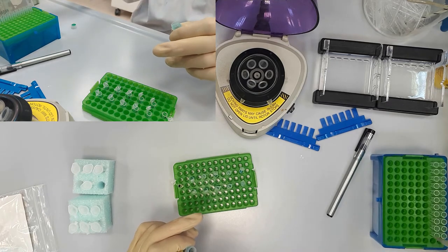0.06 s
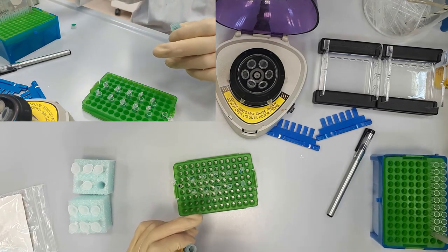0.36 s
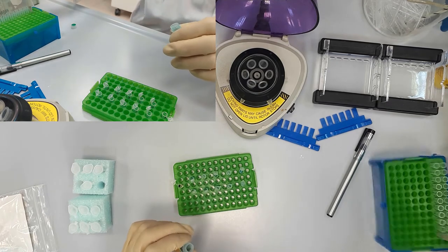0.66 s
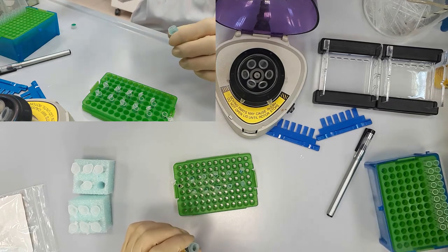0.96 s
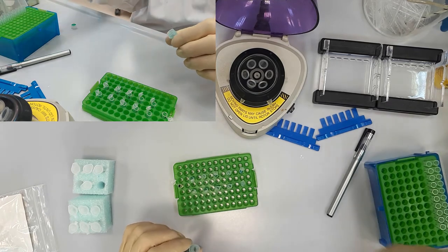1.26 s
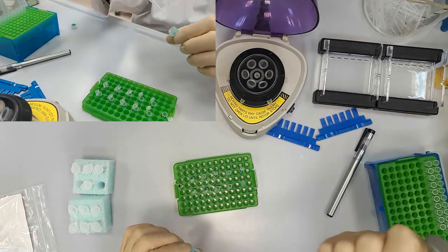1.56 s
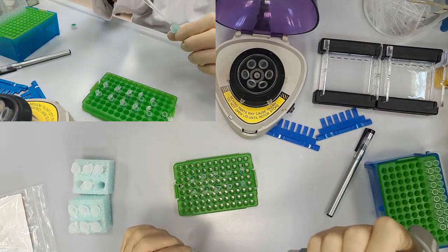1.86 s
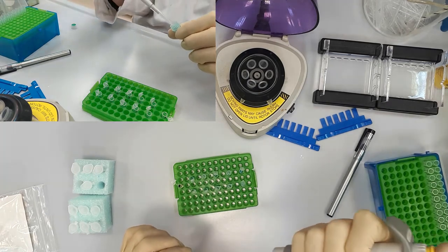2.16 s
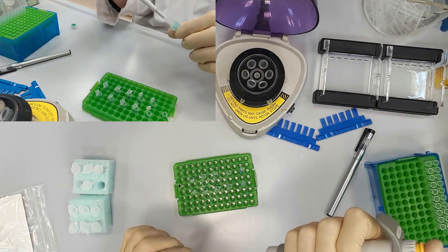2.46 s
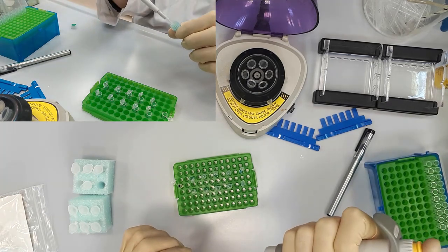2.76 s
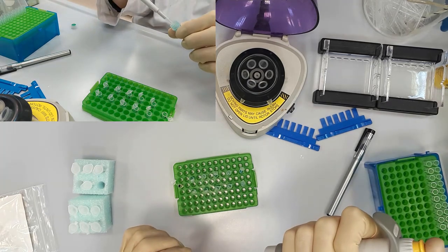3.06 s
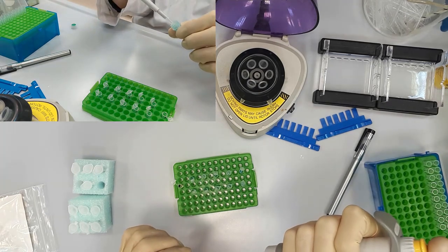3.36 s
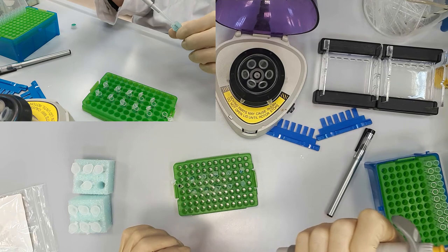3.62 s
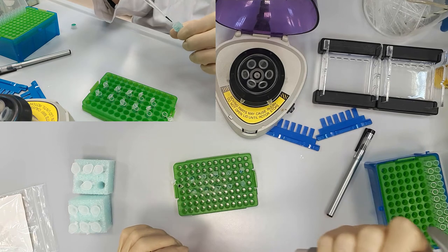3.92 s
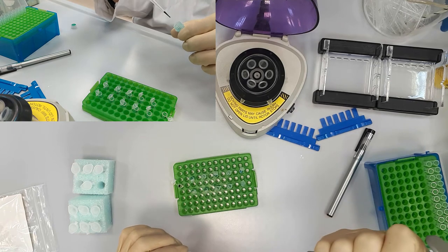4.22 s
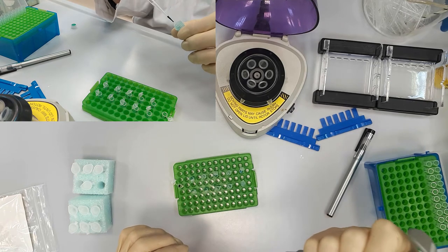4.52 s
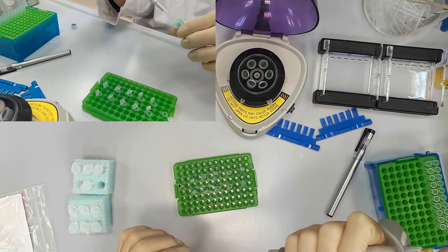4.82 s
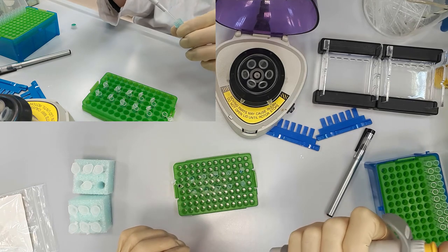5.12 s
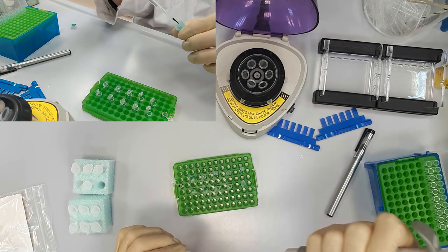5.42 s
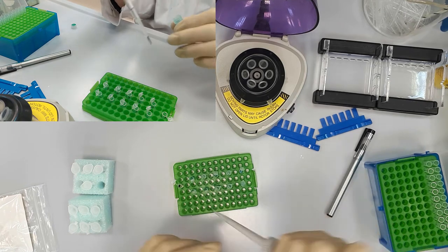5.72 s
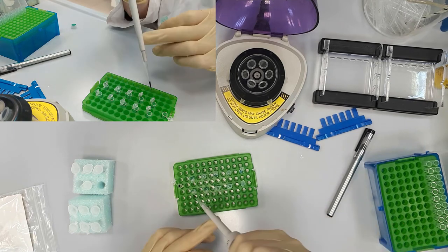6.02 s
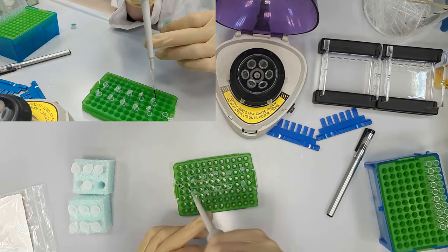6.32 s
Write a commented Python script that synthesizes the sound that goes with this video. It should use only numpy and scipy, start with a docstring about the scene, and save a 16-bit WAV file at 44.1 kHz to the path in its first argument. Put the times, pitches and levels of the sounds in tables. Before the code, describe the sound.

Small plastic tubes click, scrape and knock in a hollow plastic rack on a laboratory bench, with one firmer knock near the end of the brief flurry. The bench rumbles softly beneath, and the hard room gives a quick echo. After that only a steady low hum of ventilation and fans remains, with a very faint glove rustle near the end. The handling sounds close, in stereo.

```python
"""A pipette and small plastic tubes knock, click and slide in a plastic rack on a laboratory bench.
Each contact thumps the hollow rack, snaps the thin tube wall and ticks the tip; the hard room
throws the sound straight back. The bench rumbles softly under the working hands. Then the work goes
on almost silently, with a faint glove rustle, over the steady hum of ventilation and fans."""
import sys
import numpy as np
from scipy import signal
from scipy.fft import rfft, irfft
from scipy.io import wavfile

SR = 44100
rng = np.random.default_rng(int(sys.argv[2]) if len(sys.argv) > 2 else 0)


def master_out(mix):
    """Clip the mix to full scale and print it as 16-bit PCM to the path in sys.argv[1]."""
    frames = np.transpose(np.atleast_2d(mix))
    ceiling = np.clip(frames, -1, 1)
    pcm = np.round(ceiling * 32767).astype(np.int16)
    wavfile.write(sys.argv[1], SR, pcm)


N = 285756
HZ, T = np.fft.rfftfreq(N, 1 / SR), np.arange(N) / SR

# A "colour" says how strong the low and high parts of a sound are, compared with each other.
# colour of moving air: frequency_hz, level_db
AIR_COLOUR = [(10, -14), (29, 0.5), (43, -2.5), (85, -3.5), (110, -4), (200, -2), (300, -9), (450, -10),
              (540, -18), (1050, -23), (1800, -31.5), (2700, -32), (3700, -38.5), (6500, -39)]
# narrow bands in which fans and ducts drone: pitch_hz, width_hz, level_db
DUCT_DRONES = [(66.5, 5.7, -56), (102.4, 9.7, -47), (124.6, 9.1, -45.5), (141.2, 10.5, -49.5),
               (156, 23, -54), (180.6, 26, -49.5), (189, 1.7, -57.5), (212.3, 3.7, -59.5),
               (239.3, 14.4, -51.5), (264, 17, -52.5), (328, 18, -62), (433.6, 14.5, -57.5), (470, 10, -66),
               (1487, 14, -71.5)]
# clear tones of the fans: pitch_hz, level_db
FAN_HUMS = [(140.7, -48), (252.8, -47.5), (430, -67)]
# how alike the background is on the left and right (1 is the same): frequency_hz, likeness
STEREO_LIKENESS = [(60, 0.93), (130, 1), (290, 0.74), (640, 0.43), (1410, 0), (3000, 0)]
# how much louder the background is on the left: frequency_hz, left_minus_right_db
STEREO_BALANCE = [(60, 6.5), (110, -1), (200, 2.5), (380, -0.5), (700, 3), (1290, 0.5), (2380, -0.5),
                  (4400, -0.5), (8120, -1.5), (15000, 0.5)]
# colour of the microphones' own hiss: frequency_hz, level_db
MIC_COLOUR = [(2000, 3), (4500, -11), (7500, -5.5), (9700, -0.5), (10600, -4), (11300, -8), (16000, -9.5)]
# colour of the bench's rumble: frequency_hz, level_db
RUMBLE_COLOUR = [(30, -6), (85, -24), (125, 10), (150, 8.5), (200, -4), (330, -10.5), (450, -18.5),
                 (700, -46.5)]
# gloves rubbing on the pipette: start_s, length_s, level_db
GLOVE_RUBS = [(5.35, 0.99, -71), (5.53, 0.13, -63.5), (5.96, .08, -70)]
# colour of the glove rustle: frequency_hz, level_db
RUSTLE_COLOUR = [(1000, -22), (4000, -8), (7000, -5), (9700, 0), (11000, -5), (12500, -12), (16000, -18)]
# the room's fading tail: frequency_hz, level_db, time_to_fade_60_db_s
ROOM_TAIL = [(305, 13, 0.26), (920, -13.5, 0.54), (1550, -2.5, 0.38), (2870, 4.5, 0.19), (6000, -5, 0.27),
             (9500, -13.5, 0.082), (15000, -1, 0.22)]
# echoes from hard surfaces nearby: delay_s, left_lead_s, level_db
HARD_ECHOES = [(.0167, .00018, -1.5), (.0315, .00027, -20), (.0500, .00025, -18)]
# how those echoes are boosted or cut: frequency_hz, gain_db
ECHO_GAINS = [(300, 16), (1000, -1), (2400, 7), (3500, -10), (4600, 7.5), (5600, -3.5), (7000, -3),
              (10000, -7), (15000, -3)]
# direct sound at the left microphone, compared with the right: frequency_hz, gain_db
LEFT_GAINS = [(500, 15), (1000, -0.5), (2500, 6), (5000, -3), (8500, -22), (13000, 1)]
# plastic sliding on plastic: start_s, length_s, judder_db, hiss_db
PLASTIC_SLIDES = [(0.073, 0.03, -47.5, -48), (0.13, 0.15, -63, -54), (0.225, 0.019, -42.5, -64),
                  (0.3, 0.13, -56, -63), (0.585, 0.13, -41, -53), (0.72, 0.042, -42.5, -55),
                  (0.79, 0.12, -58, -63)]
# colour of the sliding hiss: frequency_hz, level_db
SLIDE_COLOUR = [(500, -25), (2000, -2), (4000, -4), (6500, 0.5), (9500, 9), (10800, -1), (11800, -22),
                (16000, -25)]
# tones at which the hollow rack rings: pitch_hz, level_db, time_to_fade_60_db_s
RACK_TONES = [(690, -11, .022), (860, -5, .022), (1060, -1.5, .021), (1370, -2.5, .02), (1800, -22, .012)]
# colour of the crack of thin plastic: frequency_hz, level_db
SNAP_COLOUR = [(300, -42), (700, -19), (1300, 11), (1900, 3.5), (2600, 2), (3400, -0.5), (4600, -4.5),
               (6300, -3.5), (10000, -15), (11500, -19), (16000, -33)]
# light plastic clicks and sharp echoes of earlier contacts: start_s, snap_db, tick_db, tick_pitch_hz
CLICKS_AND_ECHOES = [(0.093, -31.5, -46, 12500), (0.1057, -35, -31.5, 8450), (0.124, -49, -37, 7950),
                     (0.21, -49, -38, 7750), (0.5491, -46, -52, 9000), (0.606, -38.5, -46, 9600),
                     (0.6226, -32.5, -33.5, 8800), (0.7, -35, -40, 4570), (0.7515, -35, -29.5, 10000),
                     (0.766, -37, -33, 8600), (0.7699, -39.5, -45, 13500), (0.784, -54, -52, 13500),
                     (0.932, -68, -47.5, 9500), (1.1534, -48.5, -43, 9300)]
# a tube touches the rack, then seats: start_s, time_to_seat_s, knock_db, pitch_factor, snap_db, tick_db
TUBE_KNOCKS = [(0.0707, .0036, -27, 0.9, -32, -25), (0.2287, .007, -27.5, 0.88, -31.5, -40),
               (0.3353, .003, -22, 0.85, -31.5, -37), (0.5045, 0.0011, -40.5, 0.77, -58, -50),
               (0.58, .002, -24.5, 0.87, -39, -40), (0.6830, .0026, -7.5, 0.93, -26, -24.5)]


def gain_of(db):
    """Turn decibels into a number to multiply a sound by."""
    return 10 ** (np.asarray(db) / 20)


def unit_level(x):
    """Scale a sound to an average (root mean square) level of 1."""
    return x / np.sqrt(np.mean(x ** 2) + 1e-20)


def look_up(points, hz, column=1):
    """Read a table's column, joining its points by straight lines over log frequency."""
    table = np.transpose(points)
    return np.interp(np.log(hz + 1), np.log(table[0] + 1), table[column])


def gain_curve(points, hz=HZ):
    """Turn a table of decibels into a gain for every frequency."""
    return gain_of(look_up(points, hz))


def add(mix, start_s, sound):
    """Mix a sound in at its start time."""
    part = mix[round(start_s * SR):][:len(sound)]
    part += sound[:len(part)]


def coloured(x, gain):
    """Give each frequency its gain, then bring the level to 1."""
    return unit_level(irfft(rfft(x) * gain, x.shape[-1]))


def surrounding_noise(gain):
    """Noise from all around: alike at both microphones in the bass, unrelated in the treble."""
    shared, separate = rfft(rng.standard_normal((2, N)))
    likeness = np.clip(look_up(STEREO_LIKENESS, HZ), -1, 1)
    lean = gain_of(look_up(STEREO_BALANCE, HZ) / 2)
    left = shared * lean
    right = (likeness * shared + np.sqrt(1 - likeness ** 2) * separate) / lean
    return unit_level(irfft(np.array([left, right]) * gain, N))


def strokes(rows, attack_s, release_s, column=2):
    """Loudness of rubbing strokes over time: each builds up, lasts its length and dies away."""
    power = 0
    for row in rows:
        age_s, length_s = T - row[0], row[1]
        rise = np.clip(age_s / attack_s, 0, 1)
        fall = np.exp(-np.maximum(age_s - length_s, 0) / release_s)
        power = power + (gain_of(row[column]) * rise * fall) ** 2
    return np.sqrt(power)


def ventilation(air_db=-43, top_hz=6000):
    """A wide rush of moving air, with the narrow drones of fans and ducts."""
    air = surrounding_noise(gain_curve(AIR_COLOUR) / np.sqrt(1 + (HZ / top_hz) ** 4))
    drone_power = sum(gain_of(db) ** 2 / width / (1 + ((HZ - hz) / width * 2) ** 2) ** 2
                      for hz, width, db in DUCT_DRONES)
    drone_gain = np.sqrt(sum(gain_of(db) ** 2 for _, _, db in DUCT_DRONES))
    return drone_gain * surrounding_noise(np.sqrt(drone_power)) + gain_of(air_db) * air


def fans(wander_hz=2.31, wander_s=0.1):
    """Fan tones keep their strength while their speed wanders a little."""
    out = np.zeros((2, N))
    for hz, db in FAN_HUMS:
        wander = coloured(rng.standard_normal(N), np.exp(-(HZ * wander_s) ** 2))
        cycles = np.cumsum(hz + wander_hz * wander) / SR + rng.random()
        tone = np.sqrt(2) * np.sin(2 * np.pi * cycles)
        side_db = look_up(STEREO_BALANCE, hz) * np.array([[.5], [-.5]])
        out += tone * gain_of(db + side_db)
    return out


def bench_rumble(work_db=-33.5, rest_db=-40, work_end_s=0.91, settle_s=0.19):
    """The bench rumbles more while the hands work at the rack, then settles."""
    working = np.exp(-np.maximum(T - work_end_s, 0) / settle_s)
    level_db = rest_db + (work_db - rest_db) * working
    return surrounding_noise(gain_curve(RUMBLE_COLOUR)) * gain_of(level_db)


def glove_rustle():
    """Gloves shift on the pipette in a few faint, hissy rubs."""
    rustle = surrounding_noise(gain_curve(RUSTLE_COLOUR))
    return rustle * strokes(GLOVE_RUBS, attack_s=0.071, release_s=0.054)


def room_tail(build_s=0.0066):
    """Countless random echoes build up, then each frequency band dies at its own speed."""
    hz, t, noise = signal.stft(rng.standard_normal((2, SR)), SR, nperseg=256)
    fade_s = look_up(ROOM_TAIL, hz, column=2)[:, None]
    fade = gain_of(-60 * t / fade_s) * (1 - np.exp(-t / build_s))
    fade /= np.sqrt(np.mean(fade ** 2, 1, keepdims=True) * SR)  # same energy for long and short fades
    return signal.istft(noise * fade * gain_curve(ROOM_TAIL, hz)[:, None], SR, nperseg=256)[1]


def scatter(x, clutter_db=-9, clutter_s=0.0038, path_sets=4, changes_per_s=10):
    """Sound bounces off bench clutter and around the room; its paths change as the hands move."""
    out = 0
    place = T * changes_per_s % path_sets
    for k in range(path_sets):
        distance = abs((place - k + path_sets / 2) % path_sets - path_sets / 2)
        share = np.cos(np.pi / 2 * np.minimum(distance, 1))  # each set of paths fades into the next
        clutter = rng.standard_normal((2, N)) * np.exp(-T / clutter_s)
        clutter *= gain_of(clutter_db) / np.linalg.norm(clutter[0])
        paths = clutter[:, :SR] + room_tail()[:, :SR]
        out = out + signal.fftconvolve((x * share)[None], paths, axes=1)[:, :N]
    return out


def room(x, right_lead_s=.00025):
    """Direct sound from the right, hard echoes from the left, then the scattered sound."""
    def delay(left_s, right_s):
        return np.exp(-2j * np.pi * HZ * np.array([[left_s], [right_s]]))
    direct = delay(right_lead_s, 0)
    direct[0] *= gain_curve(LEFT_GAINS)
    echoes = sum(gain_of(db) * delay(delay_s, delay_s + lead_s) for delay_s, lead_s, db in HARD_ECHOES)
    return irfft(rfft(x) * (direct + echoes * gain_curve(ECHO_GAINS)), N) + scatter(x)


def rack_ring(pitch_factor, rise_s=0.00028):
    """One blow rings the hollow rack briefly; the pitch depends on where it is hit and how it is held."""
    t = np.arange(2048) / SR
    # neighbouring tones swing against each other, so the knock swells for a millisecond
    ring = sum((-1) ** k * gain_of(db - 60 * t / fade_s) * np.sin(2 * np.pi * pitch_factor * hz * t)
               for k, (hz, db, fade_s) in enumerate(RACK_TONES))
    ring *= 1 - np.exp(-t / rise_s)
    return ring / abs(ring).max()


def slips(per_s, spread_db):
    """Friction is a string of tiny slips of uneven size."""
    size = gain_of(spread_db * np.minimum(rng.exponential(1, N), 3))
    return size * rng.standard_normal(N) * (rng.random(N) < per_s / SR)


def sliding(attack_s=0.0053, release_s=0.023):
    """Plastic slides on plastic: coarse slips shake the rack, fine ones hiss where the parts touch."""
    coarse = slips(per_s=2000, spread_db=1)
    fine = slips(per_s=6000, spread_db=2.5)
    judder = unit_level(signal.oaconvolve(coarse, rack_ring(pitch_factor=0.89))[:N])
    hiss = coloured(fine, gain_curve(SLIDE_COLOUR))
    return (judder * strokes(PLASTIC_SLIDES, attack_s, release_s, column=2)
            + hiss * strokes(PLASTIC_SLIDES, attack_s, release_s, column=3))


def contact(knock_db, pitch_factor, snap_db, tick_db, tick_hz=8800,
            rise_s=0.00035, snap_s=0.0037, tick_s=0.0023, tick_width_hz=1300):
    """One contact knocks the rack, snaps the tube wall and ticks the tip, all in a few milliseconds."""
    t, hz = np.arange(2048) / SR, np.fft.rfftfreq(2048, 1 / SR)
    wall, tip = rng.standard_normal((2, len(t)))
    cracks = wall * abs(wall)  # a few cracks stand out
    snap = coloured(cracks, gain_curve(SNAP_COLOUR, hz)) * np.exp(-t / snap_s)
    tick_band = 1 / (1 + ((hz - tick_hz) / tick_width_hz) ** 2)
    tick = coloured(tip, tick_band) * np.exp(-t / tick_s)
    crunch = gain_of(snap_db) * snap + gain_of(tick_db) * tick
    onset = 1 - np.exp(-t / rise_s)
    return gain_of(knock_db) * rack_ring(pitch_factor) + onset * crunch


def knocks_and_clicks():
    """A tube knocks as it touches the rack and as it seats; light clicks and sharp echoes sound once."""
    out = np.zeros(N)
    for start_s, seat_s, knock_db, pitch_factor, snap_db, tick_db in TUBE_KNOCKS:
        # the touch knocks softer and higher and ticks less; the seating snaps less
        touch = contact(knock_db - 11, pitch_factor * 1.227, snap_db, tick_db - 5.5)
        seating = contact(knock_db, pitch_factor, snap_db - 8, tick_db)
        add(out, start_s, touch)
        add(out, start_s + seat_s, seating)
    for start_s, snap_db, tick_db, tick_hz in CLICKS_AND_ECHOES:
        knock_db = snap_db - 12  # these carry very little of the rack's knock
        add(out, start_s, contact(knock_db, 1, snap_db, tick_db, tick_hz))
    return out


def scene():
    """The plastic sounds echo in the room, over the quiet sounds of hands and moving air."""
    plastic = room(knocks_and_clicks() + sliding())
    return plastic + bench_rumble() + glove_rustle() + ventilation() + fans()


def record(dry, hiss_db=-63.5, top_hz=15800):
    """The microphones add their own hiss, and the highest treble is cut off."""
    noisy = dry + gain_of(hiss_db) * surrounding_noise(gain_curve(MIC_COLOUR))
    low_pass = signal.firwin(511, top_hz, window=("kaiser", 9), fs=SR)
    return signal.oaconvolve(noisy, low_pass[None], "same")


dry = scene()
out = record(dry)
master_out(out)
```